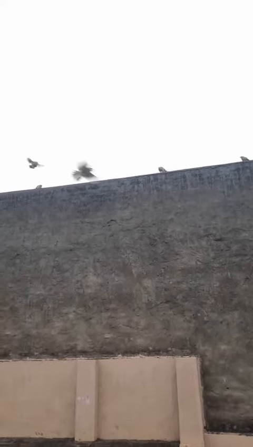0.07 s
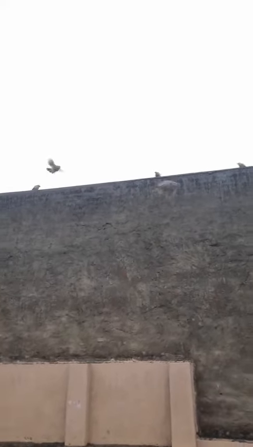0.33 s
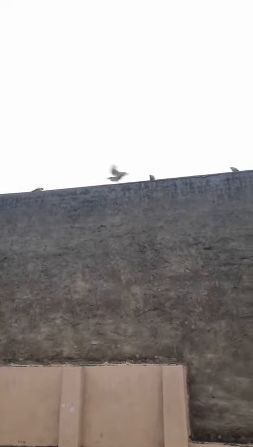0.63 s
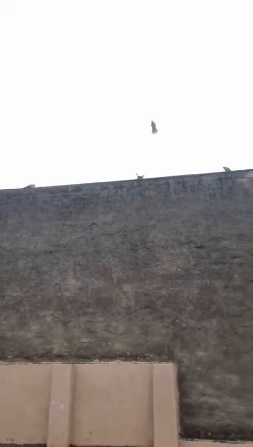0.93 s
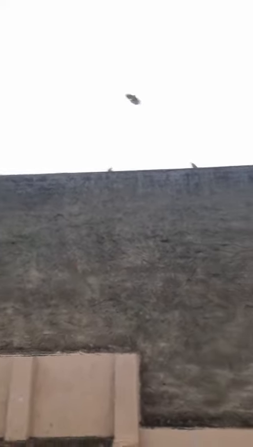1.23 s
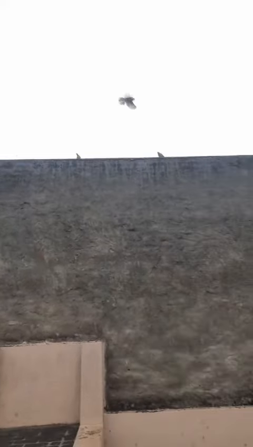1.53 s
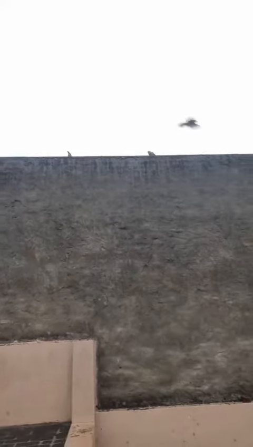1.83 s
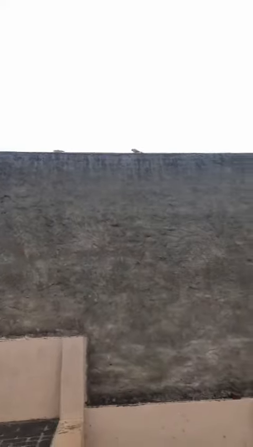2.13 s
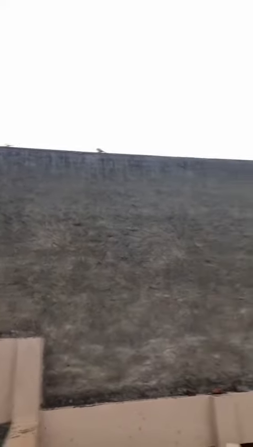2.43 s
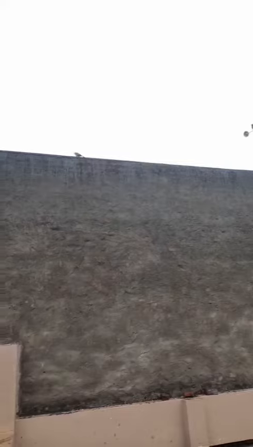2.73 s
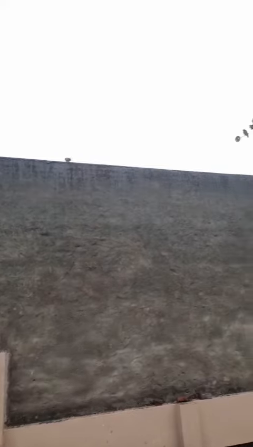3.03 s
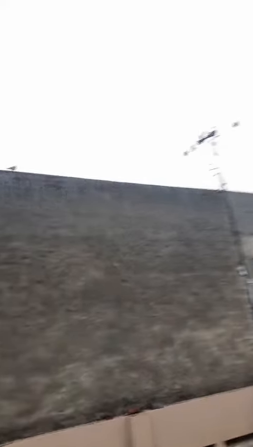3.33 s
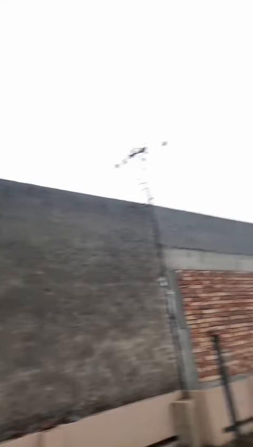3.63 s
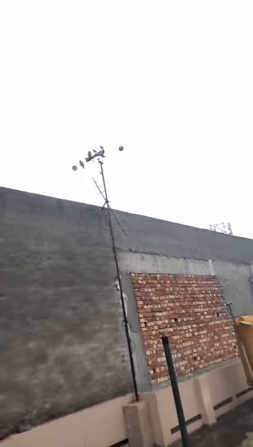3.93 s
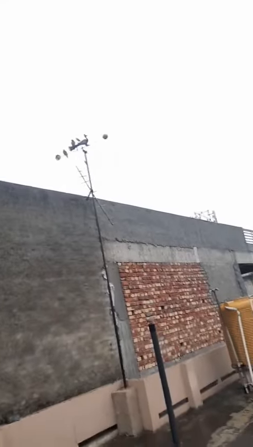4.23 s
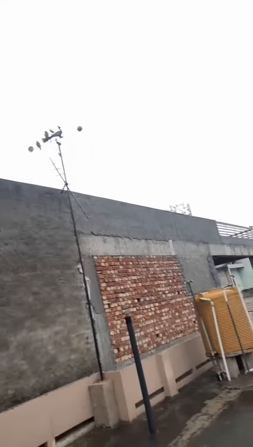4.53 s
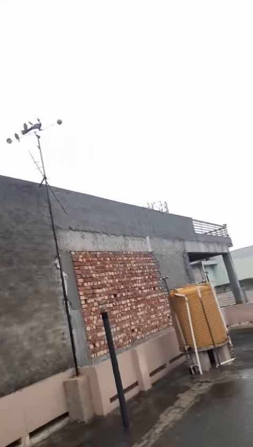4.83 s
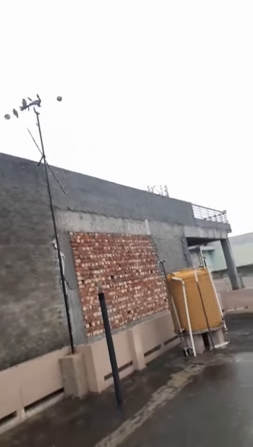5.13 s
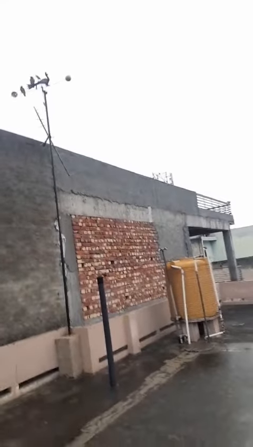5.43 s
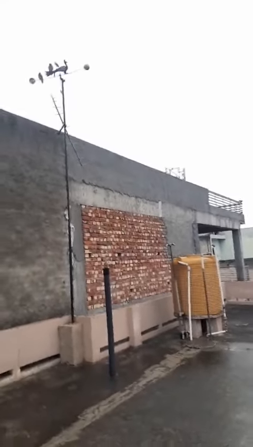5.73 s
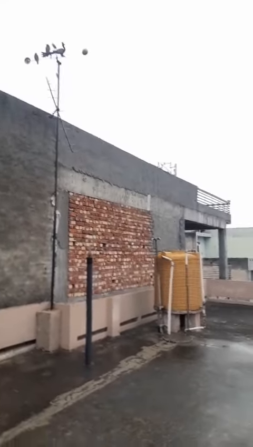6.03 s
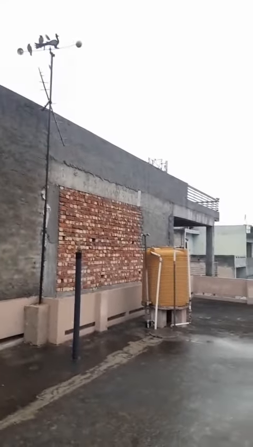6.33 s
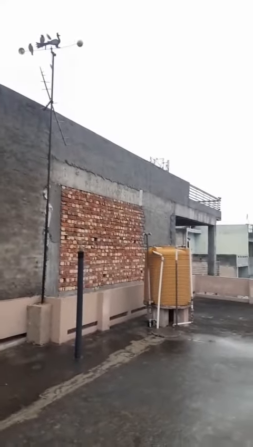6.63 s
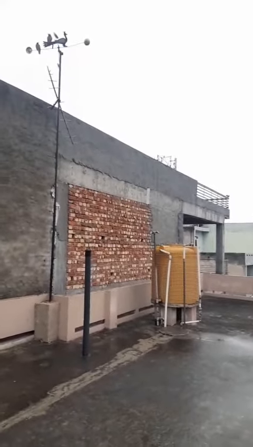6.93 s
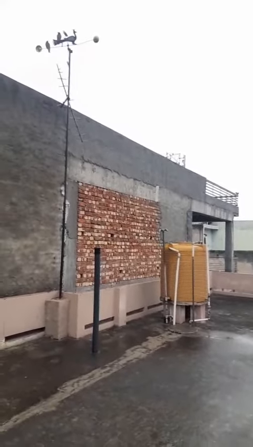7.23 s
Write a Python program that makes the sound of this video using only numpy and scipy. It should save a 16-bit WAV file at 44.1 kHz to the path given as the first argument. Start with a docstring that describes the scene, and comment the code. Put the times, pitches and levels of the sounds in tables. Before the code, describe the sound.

Birds squeal, whistle and screech in quick overlapping calls, echoing off rooftop walls, with distant traffic rumbling underneath.

```python
"""A walled rooftop in town, where a flock of babblers squabbles. Whistles, thin squeals and harsh
screeches overlap: in each call the syrinx scoops up, sags, then breaks and plunges in a rasp.
Nasal notes open the quarrel and dry chacks end it. The wet roof and its walls throw the calls back.
Underneath, traffic rumbles, a distant motor hums, and there is one small knock."""
import sys
import numpy as np
from scipy import signal
from scipy.fft import rfft, irfft
from scipy.io import wavfile

SR = 44100
rng = np.random.default_rng(int(sys.argv[2]) if len(sys.argv) > 2 else 0)


def file_out(sig):
    """Save sig as 16-bit WAV at sys.argv[1]."""
    # one column per channel
    cols = np.atleast_2d(sig).T
    # limit, then scale
    lim = np.clip(cols, -1, 1)
    pcm = np.round(lim * 32767).astype(np.int16)
    wavfile.write(sys.argv[1], SR, pcm)


N = 325017


def gain_of(db):
    """Decibels to amplitude."""
    return 10 ** (np.asarray(db) / 20)


def unit_rms(x):
    """Scales to rms 1."""
    return x / np.sqrt(np.mean(x ** 2) + 1e-20)


def at_hz(points, hz):
    """Reads a spectrum on a log-frequency axis."""
    point_hz, value = np.transpose(points)
    return np.interp(np.log(hz + 1), np.log(point_hz + 1), value)


def automation(rows, column=1):
    """One column of a time table at every sample."""
    rows = np.array(rows)
    return np.interp(np.arange(N) / SR, rows[:, 0], rows[:, column])


def add(mix, start_s, sound):
    """Mixes a stereo sound in at its start time."""
    part = mix[:, max(round(start_s * SR), 0):][:, :sound.shape[1]]
    part += sound[:, :part.shape[1]]


def ramp(t, start, end):
    """Smooth fade from 0 to 1."""
    return np.sin(np.pi / 2 * np.clip((t - start) / (end - start + 1e-9), 0, 1)) ** 2


def phase_of(hz):
    """Running phase of a moving pitch."""
    return 2 * np.pi * np.cumsum(hz) / SR


def waver(rate_hz, size=8192):
    """Random wandering of rms 1, rolled off above the given rate."""
    hz = np.fft.rfftfreq(size, 1 / SR)
    return unit_rms(irfft(rfft(rng.standard_normal(size)) / (1 + (hz / rate_hz) ** 4), size))


def hiss(colour, size=8192):
    """Noise of rms 1 with the given spectrum."""
    eq = gain_of(at_hz(colour, np.fft.rfftfreq(size, 1 / SR)))
    return unit_rms(irfft(rfft(rng.standard_normal(size)) * eq, size))


# Colour of the traffic bed. Each row: frequency in Hz, relative level in dB.
TOWN_COLOUR = [(20, -48), (35, -7), (60, 2.5), (105, 4), (160, -7), (290, -10.5), (450, -18.5), (900, -23),
               (2200, -15.5), (3500, -25.5), (7000, -42), (16000, -42)]
# Its stereo image. Each row: frequency in Hz, left-right correlation (1 is mono).
TOWN_CORRELATION = [(100, .98), (250, 0.92), (500, 0.73), (1000, 0.38), (3000, 0.38)]
# Its two faders. Each row: time in seconds, rumble gain in dB, wash gain in dB.
TOWN_FADERS = [(0, -39, -38.5), (1.5, -41.5, -39.5), (3.3, -39, -37), (4.5, -40.5, -37),
               (5.3, -37.5, -36.5), (6.3, -38.5, -34.5), (7.37, -38, -36)]


def town(crossover_hz=220):
    """Traffic rumble, nearly mono, and a wider wash above it."""
    hz = np.fft.rfftfreq(N, 1 / SR)
    left, independent = rfft(rng.standard_normal((2, N)))
    alike = at_hz(TOWN_CORRELATION, hz)
    right = alike * left + np.sqrt(1 - alike ** 2) * independent
    spectrum = np.array([left, right]) * gain_of(at_hz(TOWN_COLOUR, hz))
    whole = irfft(spectrum, N)
    rumble = irfft(spectrum / (1 + (hz / crossover_hz) ** 4), N)
    bed = rumble * gain_of(automation(TOWN_FADERS, column=1))
    bed += (whole - rumble) * gain_of(automation(TOWN_FADERS, column=2))
    return bed / whole.std() * gain_of([[-.3], [.3]])


# The motor's tone. Each row: harmonic number, level in dB before the fader.
MOTOR_HARMONICS = [(1, -48.5), (2, -65), (3, -60.5), (4, -62.5)]
# The hum swells late in the scene. Each row: time in seconds, gain in dB.
MOTOR_FADER = [(0, -9.5), (4.5, -9), (5.6, -5.5), (6.5, 1), (7.37, 4)]


def motor(hum_hz=323.3, drift=.0043):
    """A far motor off to the right, whose harmonics drift and fade on the way."""
    phase = phase_of(hum_hz * (1 + drift * waver(11.7, N)))
    hum = sum(gain_of(db) * np.sin(k * phase) * (1 + .35 * waver(6, N)) for k, db in MOTOR_HARMONICS)
    return np.sqrt(2) * hum * gain_of(automation(MOTOR_FADER)) * gain_of([[-4], [2.5]])


def knock(hz=560, level_db=-17, t60_s=.0071):
    """One small dead knock, close and centred: a sine damped almost at once."""
    t = np.arange(2048) / SR
    return np.tile(-gain_of(level_db - 60 * t / t60_s) * np.sin(2 * np.pi * hz * t), (2, 1))


# The rooftop's ring. Each row: frequency in Hz, seconds to die away by 60 dB.
WALL_DECAY = [(1000, 0.73), (2500, 0.58), (4500, 0.55), (8000, 0.8), (14000, 0.65)]
# Echo send, riding up as the birds move off. Each row: time in seconds, gain in dB.
ECHO_SEND = [(0, -10.5), (1, -12), (2, -9.5), (3.5, -7), (5, -8), (6.2, -6.5), (7.3, -20.5)]


def wall_echoes(flock, build_s=.03, size=32768):
    """Scattered echoes off roof and walls build up briefly and die fastest around 4.5 kHz."""
    reflections = rng.standard_normal((2, size)) * (rng.random((2, size)) < .1)
    hz, t, bands = signal.stft(reflections, SR, nperseg=256)
    envelope = gain_of(-60 * t / at_hz(WALL_DECAY, hz)[:, None]) * ramp(t, 0, build_s)
    eq_db = at_hz([(1000, -1), (2300, 6.5), (4500, -1.5), (8000, -.5), (14000, -1)], hz)
    tail = signal.istft(bands * envelope * gain_of(eq_db)[:, None], SR, nperseg=256)[1]
    tail /= np.linalg.norm(tail, axis=1, keepdims=True)
    return signal.fftconvolve(flock * gain_of(automation(ECHO_SEND)), tail, axes=1)[:, :N]


def place(sound, left_db, spread_s=.000481, bounce_db=-14.5, bounces=6):
    """Pans a bird and adds its own early bounces off the roof and walls."""
    size = 2 * len(sound)
    phase_per_s = -2j * np.pi * np.fft.rfftfreq(size, 1 / SR)
    delays_s = np.r_[0, rng.uniform(.003, .04, bounces)]
    lags_s = np.r_[0, spread_s * rng.uniform(-1, 1, bounces)]  # bounces arrive from the sides
    gains = np.r_[1, gain_of(bounce_db) * rng.choice([-1, 1], bounces)]
    paths = [gains @ np.exp((delays_s + side * lags_s)[:, None] * phase_per_s) for side in (-1, 1)]
    return irfft(rfft(sound, size) * np.array(paths), size) * gain_of([[left_db / 2], [-left_db / 2]])


# Timing between the sides. Each row: frequency in Hz, lead of the left in radians.
LEFT_LEAD = [(1000, 0), (2600, .9), (3400, 2.4), (4100, .3), (4800, -.9), (5700, -2.0), (7000, 0),
             (16000, 0)]
# Balance between the sides. Each row: frequency in Hz, left over right in dB.
LEFT_BALANCE = [(1000, 0), (2500, -8), (4500, -2.5), (7000, -1), (13000, -0.5)]


def mic_shadow(birds):
    """The body between two microphones shades and delays one against the other."""
    hz = np.fft.rfftfreq(N, 1 / SR)
    shade = gain_of(at_hz(LEFT_BALANCE, hz) / 2)
    lag = np.exp(-1j * at_hz(LEFT_LEAD, hz))
    return irfft(rfft(birds) * np.array([shade, lag / shade]), N)


def harmonics(hz, phase, colour, first=1, last=14):
    """The syrinx's harmonics, weighted by the throat, at steady power."""
    k = np.arange(first, last + 1)[:, None]
    weight = gain_of(at_hz(colour, k * hz)) * (k * hz < SR / 2.4)
    return (weight * np.sin(k * phase)).sum(0) / np.sqrt((weight ** 2).sum(0) / 2 + 1e-6)


# The throat's colour in a nasal note. Each row: frequency in Hz, relative level in dB.
NASAL_COLOUR = [(800, -17), (1200, -4), (2300, -9.5), (3500, 7), (4900, -1.5), (7000, -11.5), (9000, -32),
                (12500, -14), (16000, -39)]
# Nasal cues. Each row: start and length in seconds, opening and closing pitch in Hz, level in dB,
# jitter as a share of the pitch.
NASAL_CUES = [(.004, 0.043, 1348, 1118, -29.5, 0.018), (0.189, 0.051, 1182, 1043, -26.5, 0.037),
              (4.622, 0.048, 1224, 1088, -36, 0.066)]


def nasal(length_s, from_hz, to_hz, level_db, jitter, breath_db=-7):
    """A low, breathy, sinking note, strongest on its third harmonic."""
    t = np.arange(8192) / SR
    hz = np.interp(t, [0, length_s], [from_hz, to_hz])
    phase = phase_of(hz * (1 + jitter * waver(520)))
    note = harmonics(hz, phase, NASAL_COLOUR) + gain_of(breath_db) * hiss(NASAL_COLOUR)
    envelope = ramp(t, 0, .016) * (1 - ramp(t, .8 * length_s, 1.15 * length_s))
    return place(gain_of(level_db) * note * envelope, left_db=-1)


# The throat's colour in a rasp, for chacks and calls. Each row: frequency in Hz, relative level in dB.
RASP_COLOUR = [(700, -12), (1400, -9.5), (2200, -4.5), (3100, 2.5), (4100, 1.5), (6300, 1), (8600, -20),
               (10500, -15.5), (12300, -4.5), (14000, -19), (16000, -59)]
# Chack cues. Each row: start in seconds, length in seconds, level in dB.
CHACK_CUES = [(0.272, 0.052, -28.5), (5.809, 0.038, -31.5), (6.793, 0.035, -29.5), (6.827, 0.034, -36.5),
              (6.863, 0.067, -28), (6.916, 0.027, -40), (6.948, 0.061, -32.5), (7.007, 0.031, -46),
              (7.037, 0.041, -43), (7.222, 0.036, -43), (7.29, 0.031, -51)]


def chack(length_s, level_db, top_hz=2600, plunge_per_s=18, jitter=.1133, breath=.93, flutter=.23):
    """A short plunging rasp with no squeal before it."""
    t = np.arange(8192) / SR
    hz = top_hz * np.exp(-plunge_per_s * np.minimum(t, length_s))
    phase = phase_of(hz * (1 + jitter * waver(726)))
    rasp = harmonics(hz, phase, RASP_COLOUR) + breath * hiss(RASP_COLOUR)
    rasp = unit_rms(rasp * np.exp(flutter * waver(300)))
    envelope = np.sin(np.pi * np.minimum(t / length_s, 1)) ** 2
    return place(gain_of(level_db) * rasp * envelope, left_db=-1)


WHISTLE, SQUEAL, SCREECH = "whistle", "squeal", "screech"
# Voice presets, which each call bends. Each row: resting pitch in Hz, greatest scoop and sag as shares
# of the lift from rest to crest, base harshness from 0 to 1, overtone gain in dB, left over right in dB.
VOICES = {WHISTLE: (1802.5, .38, .25, .25, -9, 2.3), SQUEAL: (1001.5, 0.3, .28, .24, -2, 2.5),
          SCREECH: (1800.5, 1, 1.05, 0.4, -10.5, 1.9)}
# Each voice's throat EQ on harmonics 1 to 3. Each row: frequency in Hz, gain in dB.
THROAT_EQ = {WHISTLE: [(2500, -1), (2950, 1.7), (5000, .5), (6000, -2), (7600, -16), (9000, -24)],
             SQUEAL: [(2000, 1), (2600, .5), (4200, -2.5), (5000, 1), (6000, 2), (6700, .5), (7700, -12),
             (8700, -26)], SCREECH: [(1900, -10), (2300, -9.5), (3700, -.3), (4700, .5), (5700, -14),
             (6700, -10.5), (7500, -13)]}
# The throat's colour on the overtones, harmonics 4 to 9. Each row: frequency in Hz, relative level in dB.
OVERTONE_COLOUR = [(7000, 19), (8600, -11), (10000, 4), (12400, 8), (13800, -9), (15500, 2), (18000, -13)]
# Brightness over the quarrel. Each row: time in seconds, overtone trim in dB.
OVERTONE_FADER = [(.4, 1.5), (1.2, -2.5), (2.7, -2), (4.3, 1), (5, 4.5), (5.4, 4.5), (6, -1.5), (7, -3)]
# Call cues. Each row: start in seconds, voice, rise and glide in seconds, crest pitch in Hz,
# tone gain in dB, rasp gain in dB.
CALL_CUES = [(.38, SQUEAL, .015, .026, 2940, -25.5, -24.5), (.453, SQUEAL, .018, .044, 2560, -28, -21.5),
             (.604, SQUEAL, 0.016, 0.026, 2467, -29.5, -22.5),
             (.675, WHISTLE, 0.0069, 0.028, 2770, -36, -29.5),
             (.726, WHISTLE, 0.0068, 0.029, 2420, -35.5, -28),
             (.744, SQUEAL, .014, 0.035, 2270, -31, -25.5), (0.83, WHISTLE, 0.023, 0.015, 2546, -30, -29),
             (.885, SQUEAL, 0.024, 0.033, 2452, -30, -23), (0.953, WHISTLE, .021, 0.043, 2840, -33, -29.5),
             (1.034, SQUEAL, .019, 0.045, 2605, -29.5, -23.5),
             (1.105, WHISTLE, 0.047, 0.037, 3046, -33, -25), (1.125, SCREECH, .008, .033, 2190, -28, -33),
             (1.178, SCREECH, .022, 0.023, 2224, -27, -28), (1.264, SCREECH, .011, 0.013, 1954, -27.5, -36),
             (1.278, WHISTLE, 0.024, 0.035, 2716, -34.5, -33),
             (1.305, SCREECH, 0.0097, 0.029, 2250, -29, -28),
             (1.403, WHISTLE, 0.0048, 0.033, 2577, -32, -28.5),
             (1.45, SCREECH, 0.016, 0.049, 2258, -28.5, -30),
             (1.613, SCREECH, 0.016, 0.038, 2246, -25, -31), (1.775, SCREECH, .01, 0.04, 2240, -29.5, -33),
             (1.85, WHISTLE, 0.037, 0.036, 3114, -35, -27.5),
             (1.929, SCREECH, 0.014, 0.037, 2260, -30.5, -30),
             (1.981, SCREECH, 0.01, 0.032, 2204, -25.5, -35.5),
             (2.085, SQUEAL, .014, 0.043, 2317, -37, -28),
             (2.245, SQUEAL, 0.021, 0.025, 2190, -38.5, -28.5),
             (2.29, WHISTLE, 0.033, 0.022, 2670, -37, -33),
             (2.391, SCREECH, .016, 0.046, 2143, -25.5, -30.5),
             (2.547, SQUEAL, 0.011, 0.027, 2202, -40.5, -29), (2.685, SQUEAL, 0.011, 0.07, 2130, -44, -34),
             (2.844, SCREECH, 0.018, 0.048, 2232, -26, -30.5),
             (3.027, SQUEAL, 0.016, .052, 2125, -41.5, -30.5),
             (3.19, SQUEAL, 0.0082, 0.037, 2090, -40, -30), (3.205, WHISTLE, 0.041, 0.023, 3003, -32, -30),
             (3.251, SCREECH, 0.028, 0.055, 2327, -28.5, -34),
             (3.35, SQUEAL, .02, 0.061, 2240, -38.5, -29.5),
             (3.424, SCREECH, 0.02, 0.029, 2078, -27.5, -32.5),
             (3.53, WHISTLE, 0.012, 0.026, 2526, -39, -27.5),
             (3.577, SCREECH, 0.029, .037, 2110, -29.5, -35), (3.625, SQUEAL, 0.012, 0.034, 2240, -58, -34),
             (3.692, WHISTLE, 0.021, 0.024, 2574, -35.5, -29),
             (3.74, SCREECH, 0.021, .038, 2087, -28, -30.5), (3.825, WHISTLE, .022, 0.033, 2500, -39, -38),
             (3.86, SQUEAL, 0.0099, 0.03, 2242, -43.5, -28),
             (3.928, SCREECH, 0.053, 0.046, 2464, -26.5, -27.5),
             (4.123, SCREECH, .014, 0.031, 2000, -31.5, -30),
             (4.288, WHISTLE, .045, .021, 2833, -34.5, -28),
             (4.362, SCREECH, 0.044, 0.033, 2250, -28.5, -30), (4.649, WHISTLE, 0.027, .06, 3020, -50, -40),
             (4.777, SQUEAL, .013, 0.026, 1923, -45.5, -32.5),
             (4.901, SCREECH, 0.038, 0.032, 2013, -29.5, -29.5),
             (5.062, WHISTLE, .04, .036, 3027, -30.5, -26.5),
             (5.219, SQUEAL, 0.016, 0.017, 2368, -43.5, -33),
             (5.266, SCREECH, .012, 0.029, 1920, -41, -37.5), (5.33, SQUEAL, 0.019, 0.045, 2180, -42, -29),
             (5.42, SQUEAL, 0.0084, 0.02, 2150, -45, -41), (5.477, SCREECH, 0.012, 0.017, 2070, -41, -35.5),
             (5.554, SCREECH, 0.038, 0.035, 2066, -31.5, -30),
             (5.674, WHISTLE, 0.012, 0.078, 2835, -48, -42), (5.772, SCREECH, 0.019, 0.021, 2034, -39, -38),
             (5.938, WHISTLE, .022, 0.033, 3060, -46.5, -52),
             (6.024, WHISTLE, 0.016, 0.03, 2550, -50.5, -42),
             (6.149, SCREECH, 0.016, 0.015, 1880, -33, -42),
             (6.25, SCREECH, 0.02, 0.045, 2000, -36.5, -37.5),
             (6.396, SCREECH, 0.044, 0.038, 1994, -30, -34.5),
             (6.566, SCREECH, 0.02, 0.022, 1885, -34, -41.5),
             (6.654, SCREECH, 0.022, .039, 2075, -33.5, -34.5),
             (6.674, WHISTLE, 0.019, 0.043, 2866, -35.5, -29.5),
             (6.755, WHISTLE, 0.015, 0.029, 3184, -37.5, -29)]


def call(start_s, voice, rise_s, glide_s, crest_hz, tone_db, rasp_db,
         plunge_s=.066, wobble=.005, breakup_db=1.6, doubling=.58, rattle_hz=330, hoarse_db=-6):
    """The syrinx scoops up to a crest, sags, then breaks into a rasp that plunges ever faster."""
    rest_hz, scoop, sag, harsh, overtone_db, left_db = VOICES[voice]
    t = np.arange(8192) / SR
    lift_hz, break_s = crest_hz - rest_hz, rise_s + glide_s
    # Calls pressed out near the resting pitch turn harsher, and faint ones are smoother.
    pressed = np.exp(-max(lift_hz, 0) / 294)
    softened = .02 * max(-34 - tone_db, 0)
    harsh = np.clip(harsh + .43 * pressed - softened, 0, 1)
    broken = ramp(t, break_s - .014, break_s + .016)
    strain = harsh * ramp(t, 0, 1.16 * break_s)

    # A slower rise scoops deeper and sags less.
    scoop_hz = lift_hz * scoop * (1 - np.exp(-rise_s / .02007))
    sag_hz = lift_hz * sag * np.exp(-rise_s / .045)
    hz = crest_hz - scoop_hz * np.clip(1 - t / rise_s, 0, 1) ** 2
    hz -= sag_hz * np.clip((t - rise_s) / glide_s, 0, 1) ** 1.4
    falling_s = np.clip(t - break_s, 0, 2 * plunge_s)
    hz *= np.exp(-9 * falling_s - 190 * falling_s ** 2)
    # An unsteady syrinx smears each harmonic in proportion to its number.
    jitter = .009 + .04 * strain + (.04 + .045 * harsh) * broken
    phase = phase_of(hz * (1 + jitter * waver(650) + wobble * waver(90)))

    tone = np.zeros_like(t)
    for k in (1, 2, 3):
        flicker_db = breakup_db * (k - 1) * waver(130)
        tone += np.sqrt(2) * gain_of(at_hz(THROAT_EQ[voice], k * crest_hz) + flicker_db) * np.sin(k * phase)
    tone *= 1 + doubling * pressed * np.sin(phase / 2 + waver(600))  # pressed calls rattle an octave down
    # The overtones come in as the pressure builds, and fray first.
    overtone_db += np.interp(start_s, *np.transpose(OVERTONE_FADER))
    overtone_db -= .016 * max(crest_hz - 2600, 0)  # the highest calls are the purest
    frayed_phase = phase + .35 * harsh * waver(1100)
    overtones = harmonics(hz, frayed_phase, OVERTONE_COLOUR, first=4, last=9)
    tone += gain_of(overtone_db) * overtones * ramp(t, 0, .5 * break_s)
    swell = ramp(t, -.003, .014 + .45 * rise_s)
    tone *= gain_of(tone_db + 1) * swell * (1 - ramp(t, break_s - .008, break_s + .0069))

    breath = np.sqrt(harsh) * hiss(RASP_COLOUR)
    rasp = (harmonics(hz, phase, RASP_COLOUR, last=10) + .98 * breath) * broken
    rasp += gain_of(hoarse_db) * breath * ramp(t, 0, break_s)
    rasp *= gain_of(rasp_db) * (1 - ramp(t, break_s - .008, break_s + plunge_s))
    # A second, slower and uneven vibration chops the voice.
    rattle = np.sin(phase_of(rattle_hz * (1 + .291 * waver(195))))
    chop = 1 + .7 * strain * rattle + .2 * waver(300)
    return place((tone + rasp) * chop, left_db)


def scene():
    """The flock and its echoes over the town, the motor and one knock."""
    flock = np.zeros((2, N))
    for start_s, *cue in CALL_CUES:
        add(flock, start_s, call(start_s, *cue))
    for source, cues in ((nasal, NASAL_CUES), (chack, CHACK_CUES)):
        for start_s, *cue in cues:
            add(flock, start_s, source(*cue))
    mix = mic_shadow(flock + wall_echoes(flock)) + town() + motor()
    add(mix, start_s=3.7398, sound=knock())
    return mix


def record(dry, cutoff_hz=15950):
    """A steep low-pass takes the very top off the mix."""
    lowpass = signal.firwin(511, cutoff_hz, window=("kaiser", 9), fs=SR)
    return signal.oaconvolve(dry, lowpass[None], "same", axes=1)


dry = scene()
out = record(dry)
file_out(out)
```